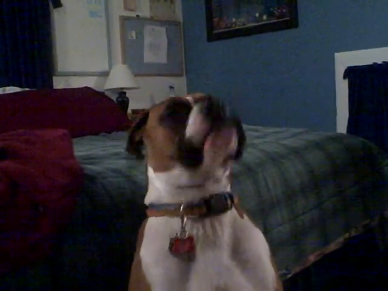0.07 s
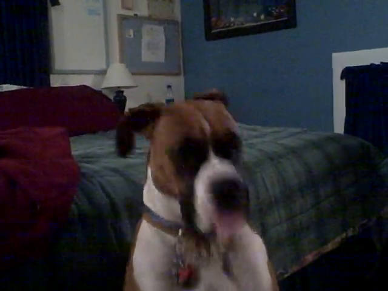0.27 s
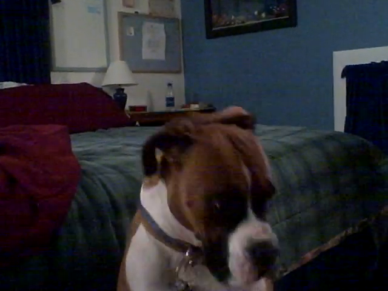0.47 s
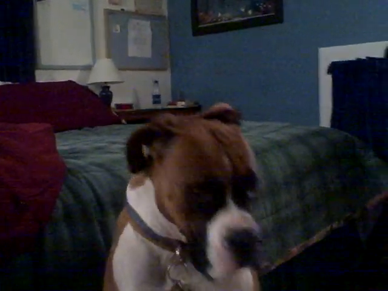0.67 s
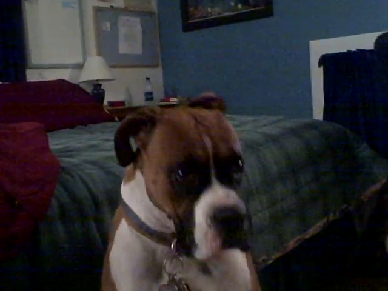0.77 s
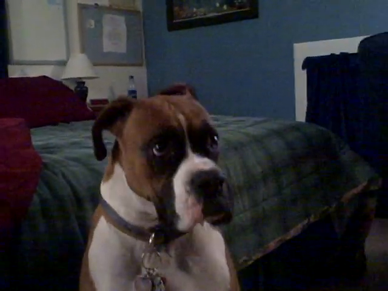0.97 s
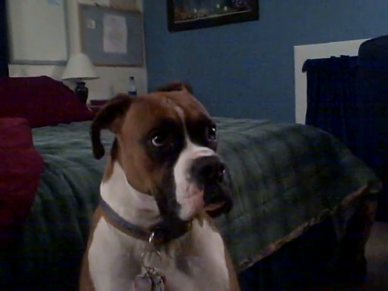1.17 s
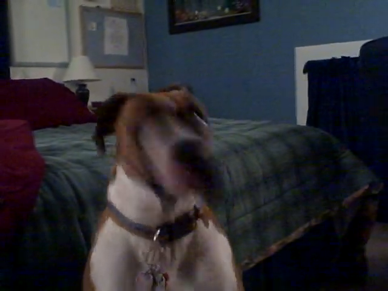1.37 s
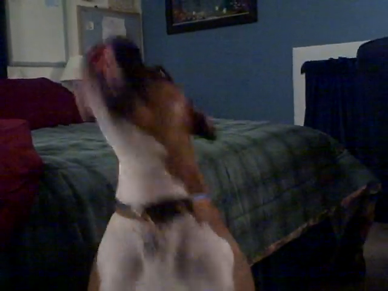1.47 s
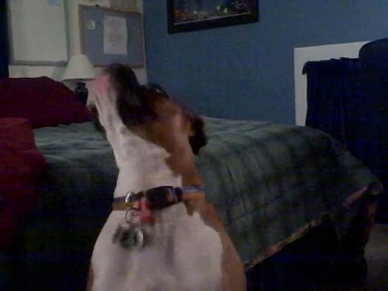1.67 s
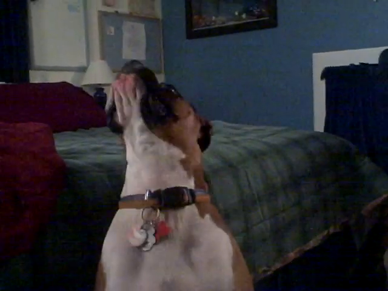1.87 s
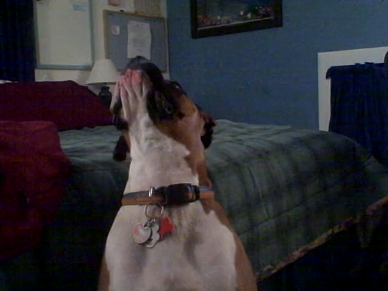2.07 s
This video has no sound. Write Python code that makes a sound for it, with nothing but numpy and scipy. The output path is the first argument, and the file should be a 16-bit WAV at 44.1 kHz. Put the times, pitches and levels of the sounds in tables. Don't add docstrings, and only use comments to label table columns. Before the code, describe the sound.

Metal dog tags clink lightly, pause, then jangle loudly and densely in a quiet bedroom.

```python
import sys
import numpy as np
from scipy import signal
from scipy.fft import rfft, irfft
from scipy.io import wavfile
from scipy.ndimage import uniform_filter1d

SR = 44100
rng = np.random.default_rng(int(sys.argv[2]) if len(sys.argv) > 2 else 0)


def bounce(signal):
    frames = np.transpose(np.atleast_2d(signal))
    limited = np.clip(frames, -1, 1)
    pcm = np.round(limited * 32767).astype(np.int16)
    wavfile.write(sys.argv[1], SR, pcm)


def gain_from_db(level_db):
    decades = np.asarray(level_db, float) / 20
    return 10 ** decades


N = 93183


def band(x, hz, width):
    return signal.lfilter(*signal.iirpeak(hz, hz / width, fs=SR), x)


def unit(x):
    return x / np.sqrt(np.mean(x ** 2))


def add(out, s, piece):
    i = max(int(s * SR), 0)
    out[i:i + len(piece)] += piece[:N - i]


def floor():
    # [f/Hz, level/dB per Hz]
    hiss_colour = [(25, 2.5), (130, -7), (300, -13.5), (900, -21.5), (2500, -35.5), (5000, -30),
                   (6500, -26.5), (8500, -21)]
    # [f/Hz, rms level/dB]
    hum_lines = [(60, -66), (120, -65), (7596, -80), (7655, -81), (8370, -78)]
    # [f/Hz, width/Hz, rms level/dB]
    buzz_bands = [(61, 26, -66.5), (121.5, 20, -62.5)]
    hiss_db, dip_hz, dip_width_hz = -59.5, 8080, 800

    hz = np.arange(N // 2 + 1) * SR / N + 1
    colour_hz, colour_db = np.transpose(hiss_colour)
    colour = gain_from_db(np.interp(np.log(hz), np.log(colour_hz), colour_db))
    hiss = irfft(rfft(rng.standard_normal(N)) * colour, N)
    hiss = hiss - band(hiss, dip_hz, dip_width_hz)

    t = np.arange(N) / SR
    hum = sum(gain_from_db(db) * np.sqrt(2) * np.sin(2 * np.pi * f * t) for f, db in hum_lines)

    buzz = np.zeros(N)
    for f, width, db in buzz_bands:
        waver = band(band(rng.standard_normal(N), f, width), f, width)
        buzz += gain_from_db(db) * unit(waver)
    return gain_from_db(hiss_db) * unit(hiss) + hum + buzz


def chatter():
    # [start t/s, length/s, level/dB]
    bursts = [(0, .023, -56.5), (0.035, .016, -33.5), (0.062, .007, -37), (0.076, .034, -53),
              (0.099, .07, -55.5), (0.334, .010, -36), (0.353, .03, -43.5), (0.396, .044, -54.5),
              (1.369, .064, -61.5), (0.5447, .003, -36.5), (0.584, .013, -42), (.607, .04, -52),
              (0.687, .012, -31.5), (0.729, .028, -53), (0.803, .06, -62.5), (1.397, .018, -30.5),
              (1.427, .026, -55), (1.45, .075, -50), (1.544, .06, -46), (1.606, .015, -37),
              (1.627, .024, -44), (1.663, .033, -39.5), (1.696, .04, -27.5), (1.753, .021, -27),
              (1.778, .022, -38.5), (1.8, .007, -22), (1.821, .012, -23), (1.844, .017, -27.5),
              (1.876, .04, -42.5), (1.909, .034, -52)]
    # [f/Hz, width/Hz, level/dB]
    body = [(6220, 230, 10.5), (6500, 1940, -2.5), (7800, 2400, -0.5), (4500, 1000, -12),
            (2220, 1600, -20.5)]
    clicks_per_s, scatter_db, fade_s = 1000, 5.5, .002

    strikes = rng.random(N) < clicks_per_s / SR
    strength = gain_from_db(scatter_db * np.clip(rng.standard_normal(N), -2, 2))
    polarity = np.sign(rng.standard_normal(N))
    clicks = unit(strikes * strength * polarity)

    gate = np.zeros(N)
    for s, length, db in bursts:
        t = np.arange(int((length + .04) * SR)) / SR
        add(gate, s, gain_from_db(db) * np.exp(-np.maximum(t - length, 0) / fade_s))

    out = np.zeros(N)
    for hz, width, db in body:
        out += gain_from_db(db) * band(band(clicks * gate, hz, width), hz, 2 * width)
    return 1.84 * out


def ticks():
    # [t/s, peak level/dB, f/Hz, snap level re peak/dB]
    head_down = [(.031, -39.5, 6800, -11.5), (.036, -17.5, 7800, -12.5), (.043, -21, 6200, -21.5),
                 (.048, -28, 6300, -20), (.056, -21, 7800, -16), (.0615, -16, 6670, -15.5),
                 (.1158, -32.5, 6000, -9.5), (.160, -33, 6220, -16), (.178, -48, 7000, -16),
                 (.185, -32.5, 6140, -29), (.2235, -28.5, 7160, -14), (.278, -33, 6000, -16),
                 (.3335, -21.5, 6800, -26), (.3409, -19, 6330, -18), (.3712, -19.5, 6500, -9),
                 (.3809, -30.5, 6500, -13), (.433, -36, 7650, -12), (.4872, -36, 7400, -17),
                 (.5455, -27, 6650, -29), (.555, -32.5, 6500, -22), (.5673, -16.5, 7050, -25),
                 (.5797, -18.5, 6300, -28), (.5847, -6, 6490, -19), (.5892, -14.5, 6620, -9),
                 (.672, -27.5, 6330, -21), (.689, -24, 6530, -23), (.728, -25.5, 6220, -12),
                 (.808, -31.5, 6600, -17.5), (.819, -35, 6500, -16.5)]
    # [t/s, peak level/dB, f/Hz, snap level re peak/dB]
    head_back = [(1.4006, -10, 6240, -11.5), (1.4036, -7.5, 6500, -19), (1.4054, -12.5, 6500, -27),
                 (1.4105, -8.5, 6720, -12), (1.444, -20, 6220, -19), (1.4961, -28, 6700, -16),
                 (1.544, -28, 7540, -12), (1.5594, -25.5, 6700, -13.5), (1.5879, -26.5, 6300, -17),
                 (1.6082, -9.5, 4500, -17), (1.6102, -14, 4450, -24), (1.6137, -18, 6600, -22),
                 (1.6187, -18, 6500, -14), (1.638, -23, 6276, -19), (1.6662, -25.5, 5400, -22),
                 (1.676, -17.5, 6920, -18), (1.6882, -19, 7500, -18.5), (1.6959, -16, 5940, -21.5),
                 (1.6986, -15.5, 4680, -20.5), (1.7031, -9, 6670, -19.5), (1.7097, -10.5, 6500, -13.5),
                 (1.7334, -14.5, 7020, -13.5), (1.7625, -8.5, 6980, -22.5), (1.804, -15.5, 6500, -17),
                 (1.8242, -4, 6500, -8.5), (1.8441, -1.5, 6650, -7.5), (1.856, -27, 6500, -16.5),
                 (1.8512, -24, 6800, -19.5), (1.9058, -22, 6550, -21.5)]
    # [t/s, peak level/dB, f/Hz]
    taps = [(.0455, -22, 6620), (0.0634, -22, 7430), (0.3353, -33, 6500), (.3377, -27, 6790),
            (0.367, -36, 6300), (.3749, -29.5, 6280), (0.6134, -35, 6360), (1.3973, -27, 5660),
            (1.408, -14.5, 6490), (1.4136, -13.5, 6300), (1.415, -19, 6080), (1.4177, -20.5, 6320),
            (1.437, -33, 7000), (1.4482, -25, 6060), (1.488, -33, 7000), (1.505, -35.5, 7500),
            (1.5645, -36, 6530), (1.5831, -34, 6160), (1.5905, -28, 6290), (1.5975, -32.5, 6300),
            (1.6068, -26, 6400), (1.617, -26.5, 5980), (1.6308, -31, 6160), (1.6351, -24, 6710),
            (1.6415, -30, 5930), (1.6488, -33, 5790), (1.679, -26.5, 6690), (1.6908, -26.5, 6600),
            (1.7047, -18, 6180), (1.7062, -13.5, 6540), (1.7107, -16, 6300), (1.7153, -19, 7400),
            (1.727, -21, 6050), (1.7296, -23, 7000), (1.7361, -18.5, 6100), (1.7385, -21.5, 6260),
            (1.771, -13, 6340), (1.7757, -20.5, 6140), (1.7789, -20, 6060), (1.7977, -16, 7000),
            (1.8095, -17.5, 6500), (1.832, -10.5, 6800), (1.8366, -15, 6220), (1.8404, -13.5, 5960),
            (1.8635, -22, 6170), (1.877, -24, 6800), (1.8905, -27, 6600), (1.8978, -27, 6010)]
    tap_snap_db, snap_hz = -18, 2720
    decay_cycles = 2.73

    out, t = np.zeros(N), np.arange(300) / SR
    touches = head_down + head_back + [(*tap, tap_snap_db) for tap in taps]
    thump = np.sin(2 * np.pi * snap_hz * t) * np.exp(-t / 0.00043)
    for s, db, hz, snap_db in touches:
        attack = 1 - np.exp(-t * hz)
        tone = np.sin(2 * np.pi * hz * t) * np.exp(-t * hz / decay_cycles) * attack
        scratch = rng.standard_normal(len(t)) * np.exp(-t / 0.00053)
        snap = 0.46 * thump + 0.75 * scratch
        add(out, s, 2.13 * gain_from_db(db) * (tone + gain_from_db(snap_db) * snap))
    return out


def rings():
    # [start t/s, length/s, level/dB, f/Hz]
    large_tag = [(0.0347, 0.0048, -32, 6220), (0.043, 0.003, -25, 6196), (0.051, 0.0036, -35, 6200),
                 (0.0645, 0.0027, -25.5, 6290), (0.07, 0.015, -42.5, 6220), (0.088, 0.011, -35.5, 6190),
                 (0.12, 0.0032, -43, 6200), (0.159, 0.0059, -43.5, 6140), (0.3, 0.027, -45, 6220),
                 (.327, 0.0054, -42.5, 6170), (0.343, 0.0053, -31, 6160), (0.399, 0.0078, -42, 6170),
                 (0.41, 0.0046, -37, 6220), (0.425, 0.0057, -34, 6210), (0.488, 0.0052, -43, 6230),
                 (0.6, 0.0044, -36, 6340), (0.616, .008, -38.5, 6330), (0.585, .0079, -25, 6260),
                 (.672, 0.0047, -41, 6100), (0.695, 0.0062, -25.5, 6290), (0.7275, 0.0026, -26.5, 6256),
                 (0.895, 0.025, -51.5, 6250), (1.412, 0.0024, -21.5, 6240), (1.44, 0.0097, -33, 6200),
                 (1.453, 0.01, -27.5, 6150), (1.467, 0.0039, -31, 6140), (1.472, 0.006, -30, 6260),
                 (1.508, 0.0055, -32, 6190), (1.517, .007, -42.5, 6160), (1.527, .015, -44, 6130)]
    # [start t/s, length/s, level/dB, f/Hz]
    small_tags = [(.569, .011, -40, 5470), (.58, 0.014, -27, 5520), (1.421, 0.015, -38.5, 769.5),
                  (1.443, .033, -39, 5527), (1.488, .008, -30, 5510), (1.495, .024, -39.5, 5540),
                  (1.559, .006, -43.5, 4430), (1.562, .036, -41, 5450), (1.597, .005, -43, 3600),
                  (1.609, .078, -46, 3570), (1.6088, .003, -25, 4630), (1.609, 0.0014, -26, 3800),
                  (1.609, 0.0024, -25.5, 5340), (1.625, .03, -40, 5340), (1.607, .078, -43.5, 4514),
                  (1.714, .026, -26.5, 4408), (1.751, .02, -27, 4550), (1.772, .055, -28, 5530),
                  (1.84, .012, -36, 5570), (1.87, .04, -39.5, 5460), (1.386, .004, -39.5, 461),
                  (1.41, .09, -42, 25.7), (1.556, .012, -47.5, 520), (1.754, .016, -36.5, 130),
                  (.053, .016, -52, 118)]
    # [start t/s, length/s, level/dB]
    jangle = [(1.716, .012, -26), (1.7406, .011, -22.5), (1.751, 0.015, -5), (1.7645, 0.007, -9.5),
              (1.781, 0.01, -19.5), (1.791, .0055, -16), (1.804, .005, -11.5), (1.822, .002, -12.5),
              (1.825, 0.005, -8), (1.8309, 0.0025, -7.5), (1.848, 0.0031, -12), (1.854, 0.0032, -16.5),
              (1.870, .013, -26), (1.953, .034, -48.5)]
    tag_hz = 6185
    t60_s, stop_s = 0.13, 0.00058
    wobble_db = 0.94
    attack_s, swell_s = 0.00037, .0007

    out = np.zeros(N)
    wobble = np.clip(unit(band(rng.standard_normal(N), 120.0, 300.)), -2, 1)
    for s, length, db, hz in large_tag + small_tags + [(*swing, tag_hz) for swing in jangle]:
        t, i = np.arange(int((length + .01) * SR)) / SR, int(s * SR)
        decay = np.log(1000) * t / max(t60_s, 3 * length)
        damping = np.maximum(t - length, 0) / stop_s
        waver_db = -db / 10 * wobble_db * wobble[i:i + len(t)] * (hz > 400)
        attack = 1 - np.exp(-t / (attack_s + swell_s * max(-42 - db, 0)))
        shape = np.exp(-decay - damping) * gain_from_db(db + waver_db) * attack
        add(out, s, shape * np.sin(2 * np.pi * hz * (t + i / SR)))
    return out


def room(x):
    level_db, t60_s, delay_s = -11.5, .2, 0.0027
    t = np.arange(SR // 3) / SR
    tail = rng.standard_normal(len(t)) * np.exp(-np.log(1000) * t / t60_s) * (t > delay_s)
    return gain_from_db(level_db) * signal.fftconvolve(x, tail / np.sqrt(np.sum(tail ** 2)))[:N]


def scene():
    background = floor()
    clicks = chatter() + ticks()
    tones = rings()
    return (clicks + tones + room(clicks + .4 * tones) + background)[None]


def low_pass(x):
    return signal.sosfilt(signal.butter(12, 15870, fs=SR, output="sos"), x)


def record(dry):
    # [t/s, level/dB]
    overloads = [
        (1.759, -50),
        (1.825, -26),
        (1.844, -43),
    ]
    grit_db, grit_s, top_hz = -9.5, 0.0013, 9650
    limit = 2 * 0.38

    envelope = uniform_filter1d(np.abs(dry), max(int(grit_s * SR), 1))
    grit = gain_from_db(grit_db) * envelope * rng.standard_normal(dry.shape)
    rounded = limit * np.tanh(dry / limit)
    top_cut = signal.cheby2(12, 70, top_hz, fs=SR, output="sos")
    mix = signal.sosfilt(top_cut, rounded + grit)
    for s, db in overloads:
        add(mix[0], s, gain_from_db(db) * np.array([1., -1.]))
    return low_pass(mix)


dry = scene()
out = record(dry)
bounce(out)
```